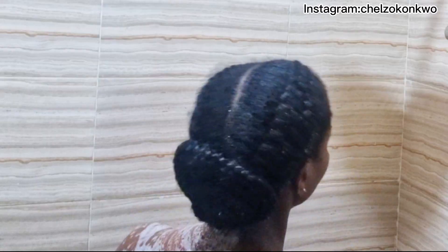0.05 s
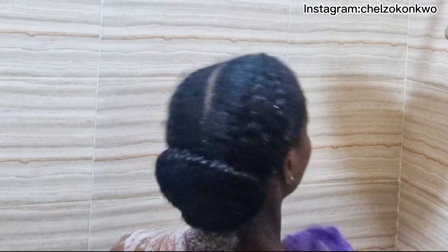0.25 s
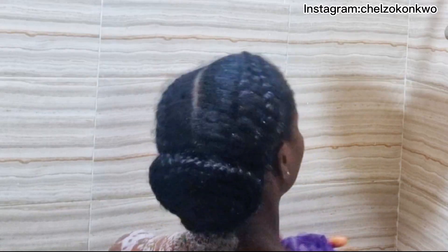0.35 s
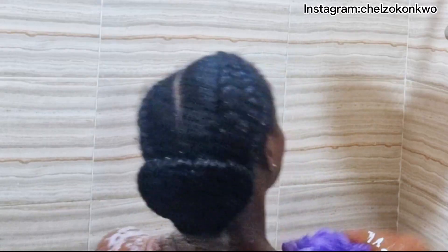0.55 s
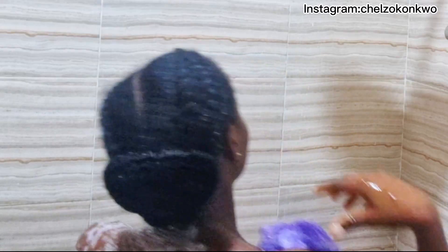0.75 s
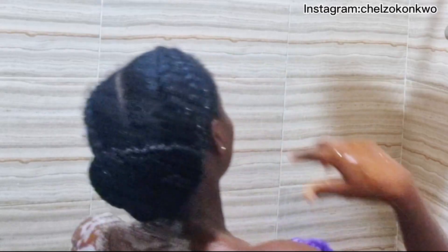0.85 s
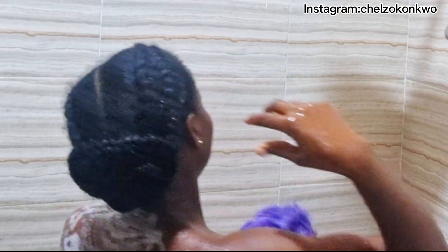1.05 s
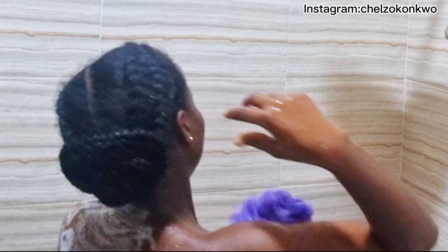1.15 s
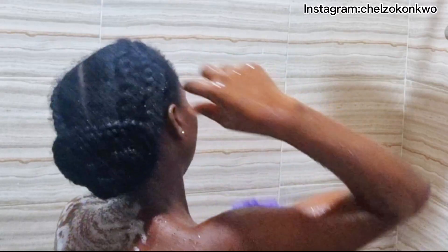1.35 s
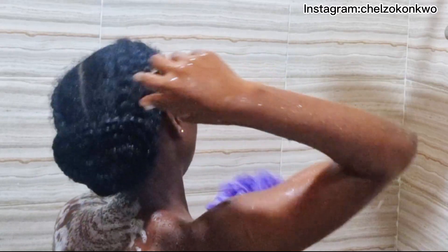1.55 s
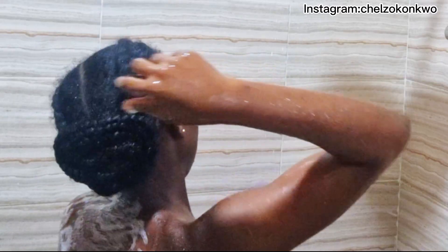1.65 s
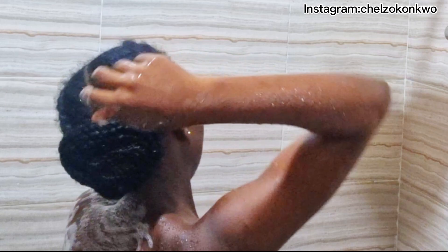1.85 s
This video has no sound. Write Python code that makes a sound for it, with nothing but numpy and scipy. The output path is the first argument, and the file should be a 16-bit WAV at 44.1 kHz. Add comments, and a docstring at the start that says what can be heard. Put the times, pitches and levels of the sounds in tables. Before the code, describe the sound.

Close scrubbing with a bath puff on lathered skin comes in short, scratchy bursts, strongest early and then fading to soft wet rubs and touches. The tiled shower adds a brief echo over a faint steady hiss.

```python
"""Someone scrubs soapy skin with a mesh bath puff in a small tiled shower.
From the start, lather fizzes and wet skin rustles over a faint steady hiss. Light brushes lead into
firm strokes, each a rush of tiny mesh snaps, loudest near 0.2 s and again near 0.6 s. Squelches, soft
bumps and a few plops join in. Near 1.3 s wet skin slides as an arm lifts, then come a few faint last
touches. The tiles ring briefly after each sound of the washing."""
import sys
import numpy as np
from scipy import signal
from scipy.fft import rfft, irfft
from scipy.io import wavfile

SR = 44100
rng = np.random.default_rng(int(sys.argv[2]) if len(sys.argv) > 2 else 0)


def log_audio(samples):
    """Write samples as a 16-bit WAV file to the path given in sys.argv[1]."""
    # one column per channel
    frames = np.atleast_2d(samples).T
    # limit to full scale, then quantise
    limited = np.clip(frames, -1, 1)
    pcm = np.round(limited * 32767).astype(np.int16)
    wavfile.write(sys.argv[1], SR, pcm)


N = 83790

# Levels are relative. A swell climbs 20 dB in rise_s and drops 20 dB in fall_s.
# A "tone" table says how strong a sound is at each pitch.
# tone of bursting bubbles: pitch_hz, level_db
FIZZ_TONE = [(1500, -36), (3500, 1.5), (5500, 3), (7200, 12.5), (8500, 8), (10500, 8.5), (12700, 11.5),
             (15500, 6.5)]
# loudness of the fizz over time: time_s, level_db
FIZZ_LEVELS = [(0, -64), (0.072, -58.5), (0.103, -53), (.16, -62.5), (.235, -54.5), (.29, -58.5), (.5, -61),
               (.8, -62.5), (.87, -61), (0.992, -64.5), (1.11, -58), (1.21, -66.5), (1.355, -72),
               (1.368, -62), (1.42, -72), (1.53, -70), (1.66, -65), (1.9, -69.5)]
# tone of rustling wet skin: pitch_hz, level_db
RUSTLE_TONE = [(120, -15), (230, -1), (500, -2.5), (800, 0.5), (1200, 0.5), (1700, 1.5), (2400, -7),
               (5000, -39)]
# loudness of the rustle over time: time_s, level_db
RUSTLE_LEVELS = [(0, -71), (.11, -71.5), (0.339, -74), (.42, -80), (.54, -78), (.68, -70), (.8, -73.5),
                 (1.08, -70), (1.4, -76), (1.5, -73.5), (1.76, -72.5), (1.9, -75.5)]
# tone of the steady hiss: pitch_hz, level_db
HISS_TONE = [(25, -40), (45, -18), (65, 1), (90, -1.5), (200, -1.5), (330, -4), (500, -14.5), (800, -8),
             (1300, -6.5), (2300, -5), (6700, -2.5), (8600, -13), (11000, -13), (12600, -1), (15500, -4.5)]
# light brushes of mesh on skin: peak_s, rise_s, fall_s, level_db, pitch_hz
BRUSHES = [(.006, 0.0066, 0.13, -56, 6140), (0.113, 0.033, 0.065, -52, 4970),
           (.175, .002, 0.053, -47, 6500), (0.2, 0.03, 0.035, -40.5, 5930),
           (.475, 0.035, 0.074, -56.5, 5080), (.525, 0.065, .08, -56.5, 6200),
           (0.561, 0.018, 0.016, -49, 6300), (0.671, 0.026, .17, -54.5, 5560),
           (0.993, 0.0076, 0.06, -59, 7040), (1.04, 0.039, 0.19, -54.5, 5280),
           (1.675, 0.064, 0.04, -62, 7200)]
# dip in the treble of the brushes: pitch_hz, level_db
BRUSH_TONE = [(3000, -1.5), (7300, 1), (8400, -8.5), (15000, 1)]
# firm strokes of the puff: peak_s, rise_s, fall_s, level_db, brightness_db_per_octave
STROKES = [(0.031, 0.0034, 0.047, -47, 1.5), (0.22, .014, .012, -25, -2),
           (0.228, 0.026, 0.065, -31.5, -3.5), (.257, 0.043, 0.063, -37.5, -3),
           (0.282, 0.037, 0.028, -37.5, -4.5), (0.319, 0.032, 0.068, -35, -0.5),
           (0.331, 0.029, 0.024, -39, -3), (0.566, 0.0033, 0.069, -33.5, 12),
           (0.596, 0.048, 0.058, -41, -10.5), (0.625, 0.017, 0.02, -42.5, -4),
           (1.094, 0.015, 0.05, -49.5, 5.5), (1.557, .001, 0.094, -57, 9)]
# tone of the mesh in a firm stroke: pitch_hz, level_db
MESH_TONE = [(100, -42), (250, -37), (1100, -39), (1600, -32), (2500, -16.5), (3250, -6), (3900, -3),
             (5200, -6.5), (5700, -8.5), (7100, -14), (8300, -28), (12500, -34), (15500, -34.5)]
# squelches of lather: peak_s, rise_s, fall_s, level_db, pitch_hz
SQUELCHES = [(0.221, 0.014, 0.017, -45.5, 2050), (0.583, 0.019, 0.062, -58, 1640),
             (.645, 0.09, 0.02, -61.5, 1310), (0.723, 0.027, 0.056, -59, 1750),
             (.753, 0.012, 0.024, -56.5, 1650), (.812, .03, 0.034, -66.5, 1520),
             (0.859, 0.02, 0.028, -58, 1490), (.945, 0.07, 0.21, -70, 1365)]
# soft bumps of hand and puff: peak_s, rise_s, fall_s, level_db
BUMPS = [(0.228, 0.06, 0.45, -72.5), (0.322, 0.012, 0.017, -60.5), (.585, 0.081, 0.15, -74),
         (0.857, 0.0057, 0.013, -67), (1.671, 0.046, 0.014, -68.5), (1.775, 0.024, 0.056, -69)]
# tone of those bumps: pitch_hz, level_db
BUMP_TONE = [(30, -47), (100, 2), (230, 8), (480, 8), (800, 10), (1500, -7.5), (4000, -23)]
# air pockets popping under the puff: start_s, level_db, final_pitch_hz
PLOPS = [(.322, -70, 520), (.859, -64, 490), (1.775, -65, 340.2)]
# wet skin sliding as the arm lifts: peak_s, rise_s, fall_s, level_db
SLIDES = [(1.251, 0.071, 0.074, -61), (1.31, 0.041, 0.037, -58), (1.346, 0.0087, 0.032, -60.5),
          (1.390, 0.041, 0.037, -61)]
# tone of sliding skin: pitch_hz, level_db
SLIDE_TONE = [(40, -34), (110, -1), (230, 1.5), (450, 1.5), (800, -3), (1500, -0.5), (2700, -3),
              (3200, 6.5), (3700, -2), (4700, -2), (7000, -28), (15000, -51)]
# high notes at which the shower stall rings: pitch_hz, level_db
HIGH_RINGS = [(2985, -9), (3086, 7), (3240, 5), (3342, -5), (3563, 12), (3682, 14), (3820, -9),
              (3955, 22.5), (4077, 6), (4499, -25), (4890, -9), (4944, -2), (5042, -1), (6402, -16)]
# low notes at which the shower stall rings: pitch_hz, level_db
LOW_RINGS = [(178, -4), (228, 6), (264, -12), (425, -5.5), (495, 9), (1206, -5), (1647, -1)]

SNAPS_PER_S, SNAP_SCATTER_DB = 6000, 3
PLOP_FALL_S, PLOP_EXTRA_PITCH = 0.02, 0.3  # a plop starts 30% above its final pitch
WASH_DB, HISS_DB = -2, -67
EARLY_DB, TAIL_DB, HIGH_RING_DB, LOW_RING_DB = -5.5, -7.5, -21.5, -22.5
EARLY_LOW_CUT_HZ, TAIL_HIGH_CUT_HZ = 1080, 5900
LOW_CUT_HZ, HIGH_CUT_HZ = 33, 15600
TIME_S = np.arange(N) / SR


def gain(db):
    """Turn decibels into a number to multiply by."""
    return 10 ** (np.asarray(db) / 20)


def normalise(x):
    """Scale a sound to an average strength (rms) of one."""
    return x / np.sqrt(np.mean(x ** 2))


def shape(x, db_at):
    """Filter a sound by db_at(pitch_hz), then normalise it."""
    size = 4096
    hz = np.maximum(np.arange(size // 2 + 1) * SR / size, 1)
    cepstrum = irfft(np.log(gain(db_at(hz))))
    # fold the second half onto the first, so the filter never rings ahead of a click
    cepstrum[1:size // 2] *= 2
    cepstrum[size // 2 + 1:] = 0
    response = irfft(np.exp(rfft(cepstrum)))
    return normalise(signal.fftconvolve(x, response)[:N])


def colour(x, tone, brightness=0):
    """Apply a tone table, tilted between 2 and 8 kHz by brightness (dB per octave)."""
    hz, db = np.array(tone).T
    tilted_db = db + brightness * np.log2(np.clip(hz, 2000, 8000))
    return shape(x, lambda f: np.interp(np.log2(f), np.log2(hz), tilted_db))


def band(x, hz, octaves):
    """Keep the part of a sound near one pitch; octaves sets the width."""
    def db_at(f):
        distance = np.log2(f / hz) / octaves
        return -20 * np.log10(1 + distance ** 2 / 2 + distance ** 4 / 8)
    return shape(x, db_at)


def clicks(per_s, scatter_db):
    """Clicks at random moments, most small and a few large."""
    happens = rng.random(N) < per_s / SR
    sign = rng.choice([-1, 1], N)
    size_db = scatter_db * np.minimum(rng.exponential(size=N), 4)
    return happens * sign * gain(size_db)


def swell(peak_s, rise_s, fall_s, level_db):
    """A loudness curve that grows to a peak and dies away."""
    age = TIME_S - peak_s
    return gain(level_db - 20 * np.maximum(-age / rise_s, age / fall_s))


def follow(levels):
    """A loudness curve that joins up (time_s, level_db) points."""
    return gain(np.interp(TIME_S, *np.array(levels).T))


def fizz():
    """Fine bubbles in the lather burst all the time."""
    return colour(clicks(per_s=4000, scatter_db=2), FIZZ_TONE) * follow(FIZZ_LEVELS)


def rustle():
    """Wet skin rustles faintly throughout."""
    return colour(clicks(per_s=1600, scatter_db=0.5), RUSTLE_TONE) * follow(RUSTLE_LEVELS)


def hiss():
    """A faint steady hiss lies under everything."""
    return gain(HISS_DB) * colour(rng.standard_normal(N), HISS_TONE)


def snaps():
    """Mesh strands catch on wet skin and let go."""
    return clicks(SNAPS_PER_S, SNAP_SCATTER_DB)


def brushes():
    """The mesh touches the skin lightly, making a thin band of snaps."""
    return sum(swell(*curve) * colour(band(snaps(), hz, octaves=0.39), BRUSH_TONE)
               for *curve, hz in BRUSHES)


def strokes():
    """Firm scrubs set off rushes of snaps, each with its own brightness."""
    return sum(swell(*curve) * colour(snaps(), MESH_TONE, brightness) for *curve, brightness in STROKES)


def squelches():
    """Squeezed pockets of foam give short, narrow bands of noise."""
    return sum(swell(*curve) * band(rng.standard_normal(N), hz, octaves=0.21) for *curve, hz in SQUELCHES)


def bumps():
    """Hand and puff bump with a soft, dull sound."""
    return colour(clicks(per_s=3400, scatter_db=2), BUMP_TONE) * sum(swell(*curve) for curve in BUMPS)


def plops():
    """Small air pockets pop and ring for a moment, sinking in pitch."""
    sound = 0
    for start_s, level_db, final_hz in PLOPS:
        age = np.maximum(TIME_S - start_s, 0)
        pitch_hz = final_hz * (1 + PLOP_EXTRA_PITCH * np.exp(-2 * age / PLOP_FALL_S))
        note = np.sin(2 * np.pi * np.cumsum(pitch_hz) / SR)
        sound += swell(start_s, 0.002, PLOP_FALL_S, level_db) * note
    return sound


def slides():
    """Wet skin sticks and slips as the arm lifts."""
    return colour(clicks(per_s=1500, scatter_db=2), SLIDE_TONE) * sum(swell(*curve) for curve in SLIDES)


def cut(x, side, hz):
    """Soften a sound above hz (side "lowpass") or below it (side "highpass")."""
    return signal.sosfilt(signal.butter(2, hz, side, fs=SR, output="sos"), x)


def echoes(fade_s, delay_s):
    """Closely packed random echoes off the walls, dropping 60 dB in fade_s."""
    return normalise(rng.standard_normal(N) * gain(-60 * TIME_S / fade_s) * (TIME_S > delay_s))


def ringing(rings, fade_s):
    """Sound trapped between the walls rings at set notes, dropping 60 dB in fade_s."""
    notes = sum(gain(db) * np.cos(2 * np.pi * hz * TIME_S) for hz, db in rings)
    return normalise(gain(-60 * TIME_S / fade_s) * notes)


def tiles(washing):
    """The close walls answer with quick bright echoes, a duller tail and a few ringing notes."""
    early = gain(EARLY_DB) * cut(echoes(fade_s=0.058, delay_s=0.0011), "highpass", EARLY_LOW_CUT_HZ)
    tail = gain(TAIL_DB) * cut(echoes(fade_s=0.32, delay_s=0.0046), "lowpass", TAIL_HIGH_CUT_HZ)
    high_notes = gain(HIGH_RING_DB) * ringing(HIGH_RINGS, fade_s=0.1)
    low_notes = gain(LOW_RING_DB) * ringing(LOW_RINGS, fade_s=0.26)
    response = (early + tail + high_notes + low_notes) / np.sqrt(N)
    return signal.fftconvolve(washing, response)[:N]


def scene():
    """Mix the washing, its echoes and the hiss into one channel."""
    puff = strokes() + brushes()
    lather = fizz() + squelches() + plops()
    body = slides() + bumps() + rustle()
    washing = gain(WASH_DB) * (puff + lather + body)
    return (washing + tiles(washing) + hiss())[None]


def record(dry):
    """Take away the deepest rumble and the very highest treble."""
    steep_high_cut = signal.ellip(10, 0.2, 70, HIGH_CUT_HZ, fs=SR, output="sos")
    return signal.sosfilt(steep_high_cut, cut(dry, "highpass", LOW_CUT_HZ))


dry = scene()
out = record(dry)
log_audio(out)
```